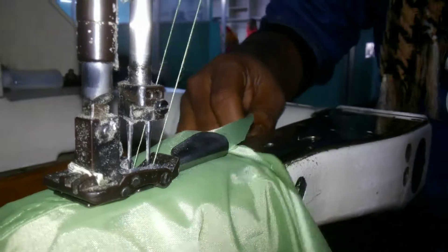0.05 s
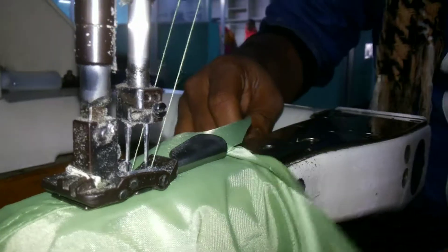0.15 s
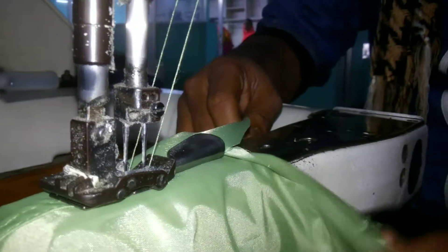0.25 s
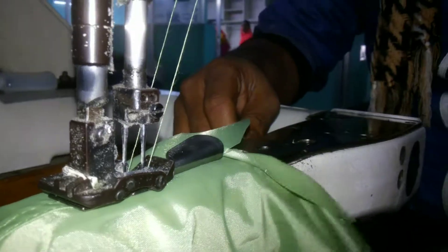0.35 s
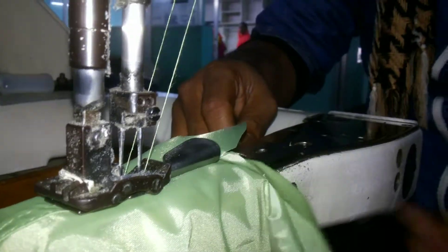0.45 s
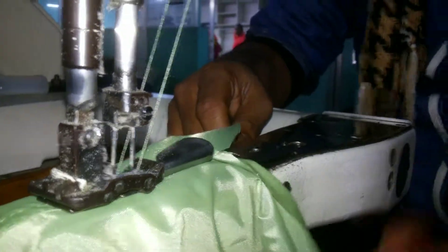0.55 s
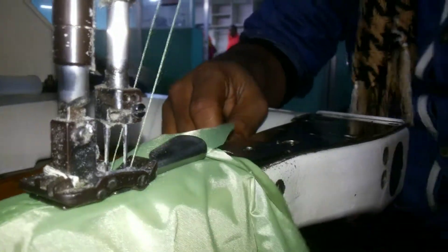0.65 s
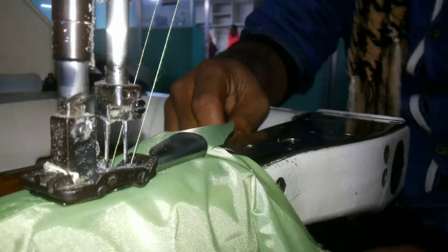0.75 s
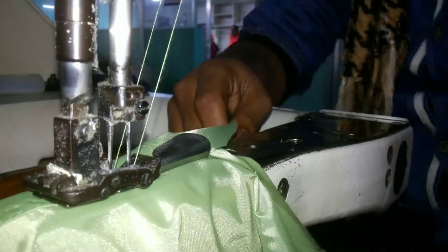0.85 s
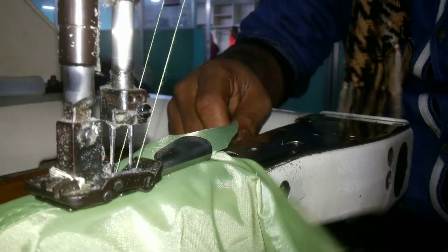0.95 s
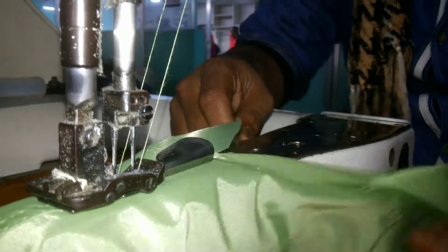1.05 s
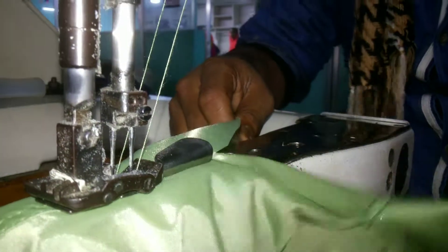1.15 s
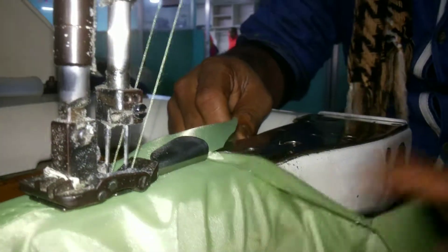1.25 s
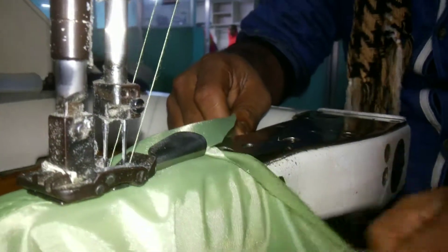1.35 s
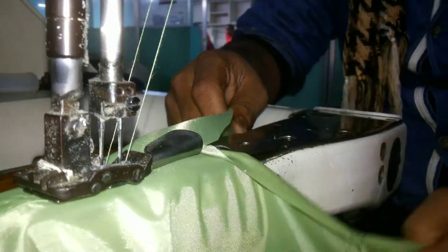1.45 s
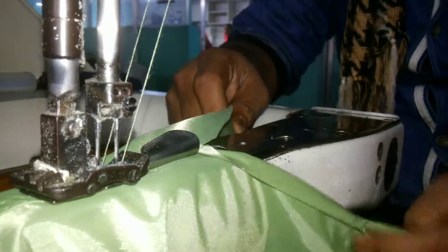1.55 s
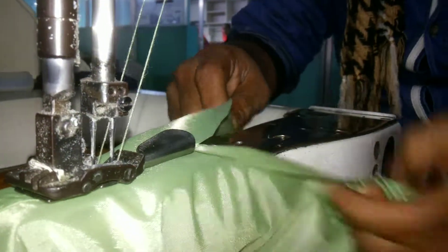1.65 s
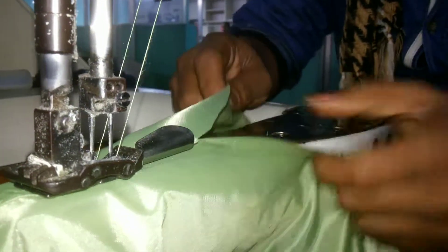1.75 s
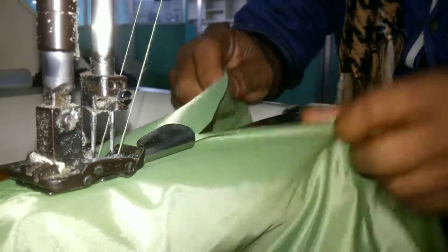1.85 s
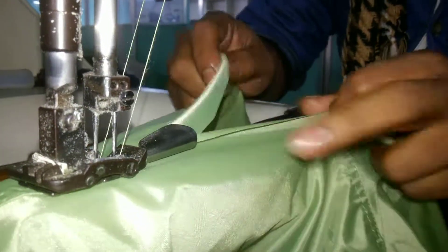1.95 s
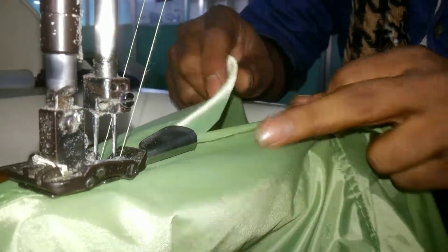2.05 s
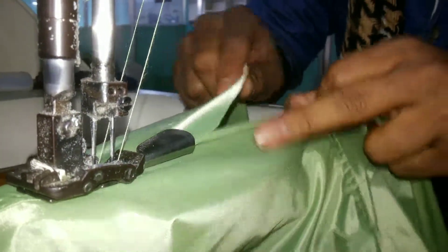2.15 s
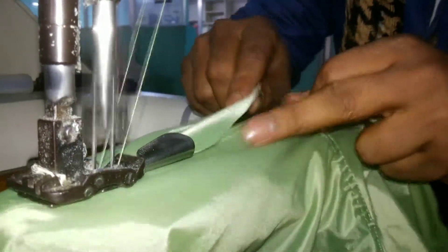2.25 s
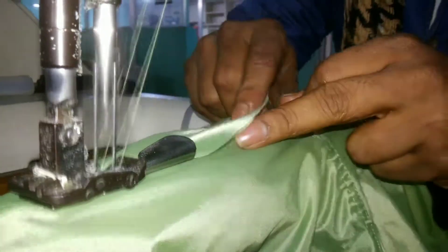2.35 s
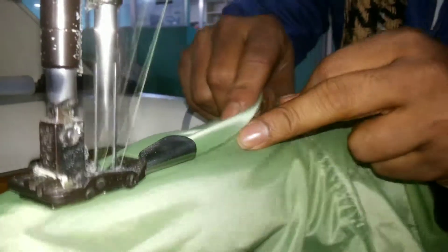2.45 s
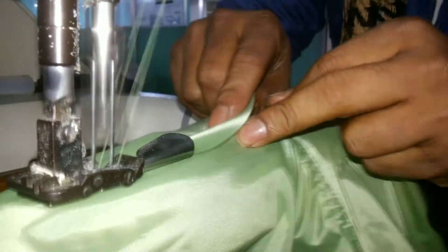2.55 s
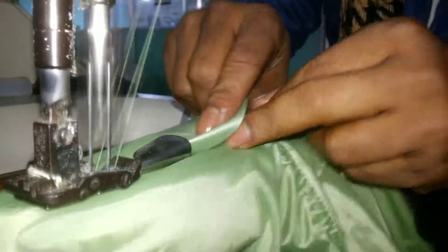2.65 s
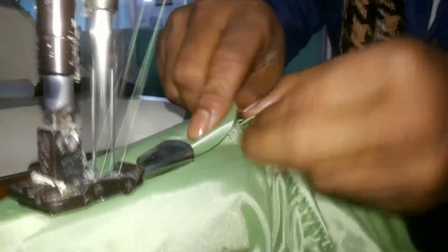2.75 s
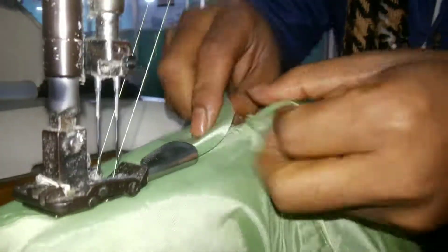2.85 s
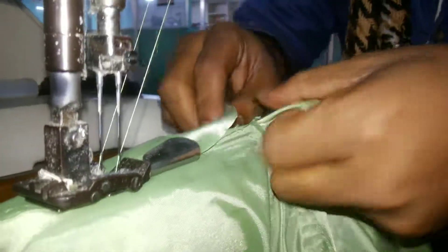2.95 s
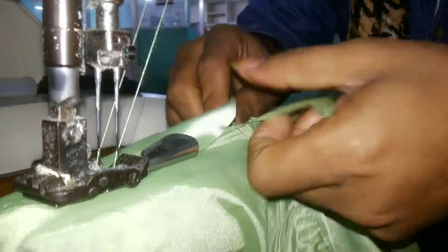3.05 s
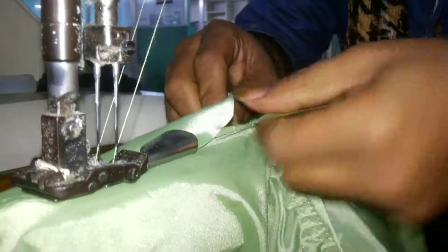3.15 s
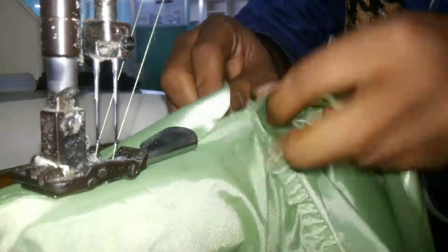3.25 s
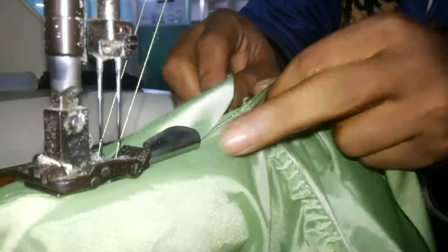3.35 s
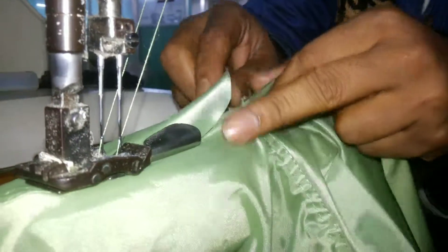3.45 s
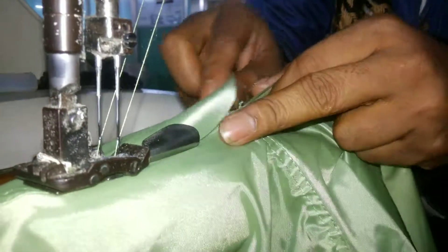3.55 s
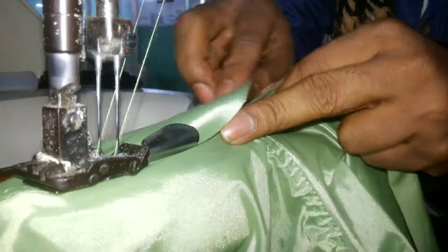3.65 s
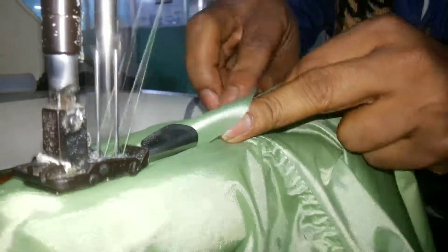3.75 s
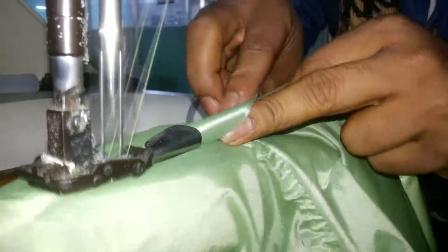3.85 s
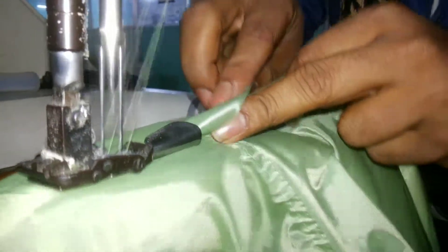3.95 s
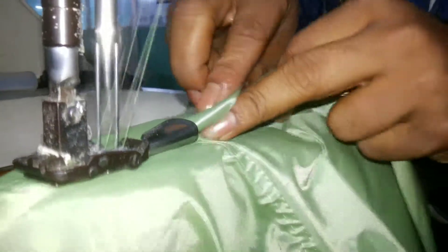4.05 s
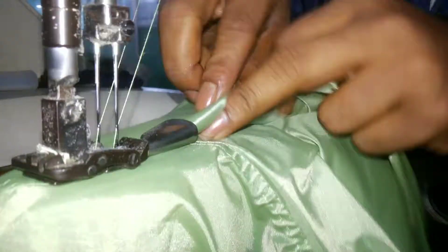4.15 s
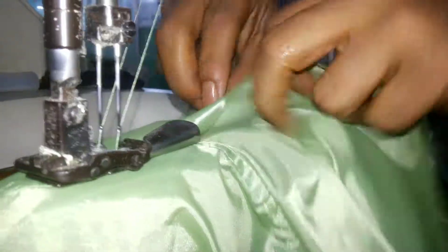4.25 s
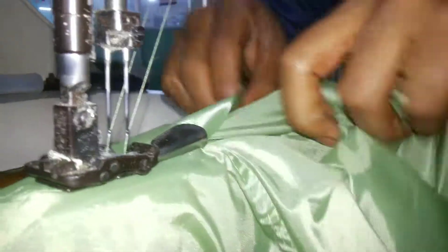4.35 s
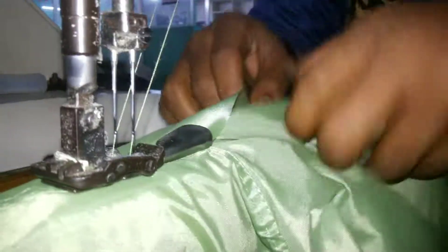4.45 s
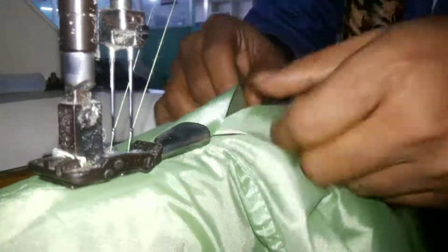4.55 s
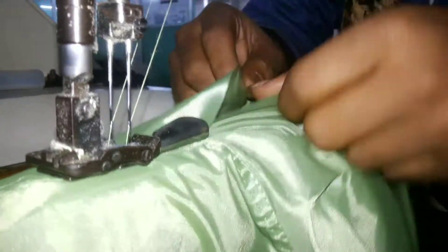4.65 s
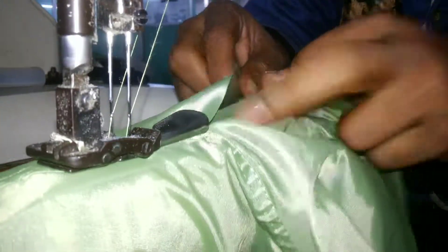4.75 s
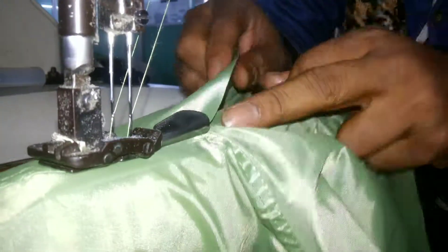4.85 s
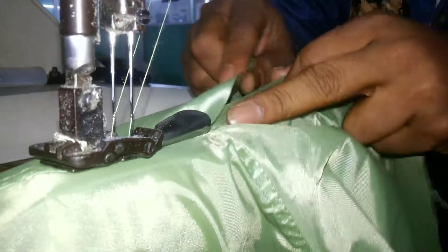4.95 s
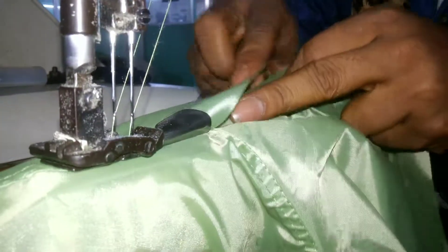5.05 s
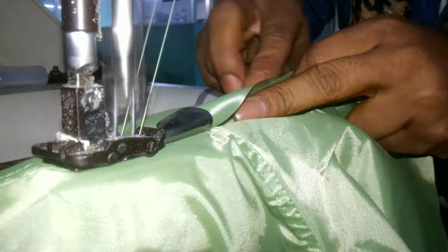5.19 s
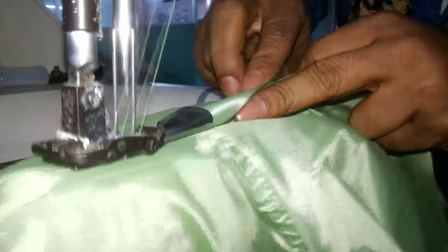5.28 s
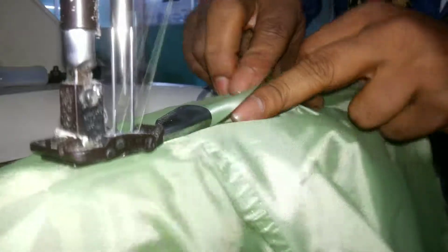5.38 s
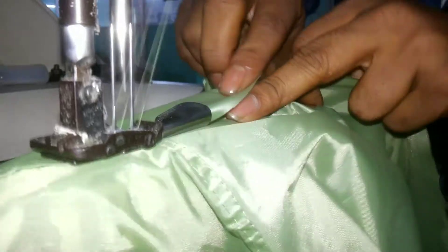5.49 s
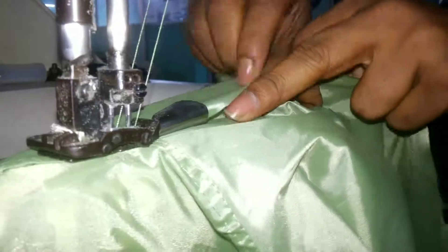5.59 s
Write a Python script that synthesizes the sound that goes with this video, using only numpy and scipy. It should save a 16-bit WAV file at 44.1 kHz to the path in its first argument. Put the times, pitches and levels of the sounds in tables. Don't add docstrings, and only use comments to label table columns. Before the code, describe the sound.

Close-up factory sewing: three fast mechanical bursts clunk in and out, separated by light cloth rustles and snaps over a faint motor hum.

```python
import sys
import numpy as np
from scipy import signal
from scipy.io import wavfile
from scipy.ndimage import uniform_filter1d

SR = 44100
rng = np.random.default_rng(int(sys.argv[2]) if len(sys.argv) > 2 else 0)


def natural_amplitude(level_db):
    exponent = np.asarray(level_db, float) / 20
    return 10 ** exponent


def dump(signal):
    limited = np.clip(np.atleast_2d(signal).T, -1, 1)
    pcm = np.round(limited * 32767).astype(np.int16)
    wavfile.write(sys.argv[1], SR, pcm)


N = 247842
T = np.arange(N) / SR

# (first stitch [s], grip [s], top speed [turns/s], brake [s], coasting time [s])
RUNS = [
    (2.3341, 2.2619, 48.31, 2.7904, .0802),
    (3.7803, 3.7342, 47.07, 4.0971, .0634),
    (5.2099, 5.2311, 47.47, 5.549, .1209),
]
STITCHES = [21, 14, 13]
SPIN_UP, CREEP = 197.7, 12.21
KNEE = 15.1
# (level [dB], drift [dB per stitch], slack of the first stitch [dB])
TICKS = [
    (-5, -0.12, 1),
    (-6.5, 0, -32),
    (-3, -0.57, -60),
]
SLACK_TURNS, COAST_DB = 0.37, -5.5
# (angle [turns], into casting [dB], into linkage [dB])
KNOCKS = [(.02, -4, -3), (.22, -2, -1), (.42, -8, -5), (.6, -1, 0), (.72, 0, -5), (.82, -6, -3)]
# (pitch [Hz], width [Hz], level [dB])
CASTING = [(380.6, 22, -11.5), (470, 53, -17.5), (597.2, 23, 1), (650, 167, 0.5), (900, 170, -3),
           (1088, 31, -5), (1235, 225, -5), (1438, 140, -8), (1560, 160, -9.5)]
# (frequency [Hz], level [dB per Hz])
LINKAGE = [(880, -40), (1500, -26), (1620, 3), (1830, -0.5), (2340, 6), (2640, 2.5), (4120, 1),
           (8080, -13.5), (12000, -14.5), (16000, -31)]
# (time [s], level [dB])
EFFORT = [
    [(2.12, -43), (2.17, -37.5), (2.22, -20), (2.25, -14), (2.4, -32.5), (2.42, -16), (2.8, -20),
     (2.88, -21), (3.12, -61)],
    [(3.646, -71), (3.7, -17.5), (3.77, -16), (3.776, -15), (3.832, -25.5), (3.99, -17.5), (4.112, -16.5),
     (4.166, -21.5), (4.36, -50)],
    [(5.11, -74), (5.144, -47), (5.186, -13.5), (5.274, -18.5), (5.34, -33.5), (5.43, -18), (5.564, -17.5),
     (5.58, -13), (5.63, -23)],
]
RATTLE_DB, RATTLE_SHARE, RATTLE_SPEED_DB = -22.5, 0.51, 12
# (multiple of the shaft speed, level [dB])
SHAKE = [(4, -26), (5, -30), (6, -29), (8, -14), (10, -13), (12, -9.5), (13, -6.5), (14, -12.5), (15, -7.5),
         (19, -12)]
# (pitch [Hz], width [Hz], level [dB])
TABLE_TOP = [(186.5, 4.2, -2), (234.2, 16.4, -2.5), (308, 51, -3.5)]
DRUM_DB, DRUM_SHARE, DRUM_FALL_DB_PER_S = -24, 0.54, 73
TUNED_SPEED, TUNED_WIDTH, TUNED_DB = 46.8, 1.6, 10.5
KICK_DB = -41
# (time [s], rod ring [dB], stand ring [dB], crack [dB], rise [s])
CLUNKS = [(2.098, -20, -21.5, -31.5, 0.007), (2.181, -19, -18, -23, 0.013), (2.2045, 3, -21, -7.5, 0.0029),
          (2.2135, -19, -11, -15, 0.00092), (2.2484, 4.5, -18, -8, 0.0011),
          (2.2909, -5, -9.5, -11.5, 0.0022), (2.7995, 6, -9, -10, 0.0012), (2.811, -2.5, -14, -6.5, 0.0039),
          (3.669, -13, -20, -19, 0.057), (3.6975, 1, -15.5, -7, 0.00035), (3.7215, -4, -9, -15, 0.0045),
          (3.735, 3.5, -13, -7.5, 0.00067), (3.7915, -6, -15, -12.5, 0.00064),
          (4.102, -0.5, -11, -8.5, 0.0032), (4.113, -9.5, -14, -32, 0.0051), (5.15, -19, -33, -36, 0.017),
          (5.1635, -15, -14, -16.5, 0.00047), (5.182, 2.5, -23, -7.5, 0.0036),
          (5.208, -2, -2.5, -5, 0.0021), (5.2205, 1, -3.5, -5.5, 0.00097), (5.238, -2, -12, -33, 0.0018),
          (5.275, -3, -45, -15.5, 0.0016), (5.572, -3, -16, -5.5, 0.0024), (5.584, -2, -18, -12, 0.0019)]
# (pitch [Hz], level [dB], time to fall 60 dB [s])
ROD = [(1033, -3.5, 0.13), (1120, -0.5, 0.057), (1197, 9, 0.026), (1275, 1.5, 0.14), (1385, 3, 0.091),
       (1495, -6, 0.11), (1690, -13, 0.12)]
# (pitch [Hz], level [dB], time to fall 60 dB [s])
STAND = [(414, -20, 0.42), (574, -15, 0.018), (621, -16, 0.029), (682.7, 3.5, 0.18), (808, 7, 0.027)]
# (pitch [Hz], level [dB], time to fall 60 dB [s])
CRACK = [(1750, 0, .012), (2050, 0, .015), (2600, -1, .012), (3050, -2, .01), (3450, -1, .012),
         (4300, -6, .008), (6000, -12, .006)]
# (time [s], peak [dB], pitch [Hz])
THUDS = [
    (2.2345, -3, 640),
    (3.7735, 0, 620),
    (5.26, 2, 625),
]
# (frequency [Hz], level [dB per Hz])
CLOTH = [(200, -26), (500, -8.5), (1200, -6), (2200, -11), (3200, -6.5), (4600, -6.5), (5300, -14),
         (8000, -19.5), (12000, -20.5), (16000, -31)]
# (start [s], length [s], level [dB])
SWISHES = [(0, 0.066, -50), (0.274, 0.052, -45), (0.329, 0.061, -43.5), (.7, 0.081, -60),
           (0.937, 0.092, -46.5), (1.001, 0.17, -36.5), (1.134, 0.25, -45), (1.37, 0.14, -44.5),
           (1.57, 0.16, -42), (1.7, 0.091, -45), (1.778, 0.12, -48), (1.93, 0.044, -42.5),
           (2.094, 0.15, -61), (3.014, 0.063, -41.5), (3.205, 0.097, -48), (3.291, 0.079, -41.5),
           (3.435, 0.11, -44.5), (4.227, 0.091, -34.5), (4.304, 0.1, -43.5), (4.363, 0.21, -42.5),
           (4.561, 0.086, -47), (4.688, 0.14, -48), (4.798, 0.015, -32), (4.807, 0.087, -39),
           (4.954, 0.041, -49.5), (5.101, 0.042, -43)]
# (time [s], peak [dB], pitch [Hz], time to fall 60 dB [s])
SNAPS = [(.2862, -27, 4220, 0.0049), (0.2946, -12.5, 770, 0.0064), (0.2956, -26, 3520, 0.0033),
         (0.3559, -5, 3550, 0.0023), (0.3544, -14, 1160, 0.0052), (0.4218, -22, 3680, 0.0026),
         (1.04, -21, 1900, .003), (1.0822, -2.5, 3160, 0.0027), (1.0914, -11, 1400, 0.0025),
         (1.101, -19, 900, 0.0061), (1.1099, -7, 1540, 0.0029), (1.108, -18, 427, 0.029),
         (1.142, -28, 3040, .005), (1.263, -15.5, 1120, 0.0023), (1.287, -15.5, 1020, 0.0025),
         (1.356, -22, 1040, 0.0051), (1.451, -28.5, 3880, 0.012), (1.755, -11, 4300, 0.0013),
         (1.872, -21.5, 814, 0.006), (1.957, -29, 3920, 0.0039), (3.053, -35, 9500, 0.0078),
         (4.28, -21.5, 3650, 0.02), (3.332, -27, 4530, 0.0036), (3.481, -38, 1010, .01),
         (4.512, -21, 705, 0.0065), (4.438, -10, 900, 0.0016), (4.688, -27, 3040, 0.0034),
         (4.806, -8, 3480, 0.0024), (4.835, -23, 3300, 0.008), (5.1264, -29, 4500, 0.006)]
# (time [s], level [dB], pitch [Hz])
SQUEAK = [(.449, -52, 3000), (.456, -38, 3300), (.461, -38, 3800), (.465, -41, 3700), (.468, -52, 3200)]
# (frequency [Hz], time to fall 60 dB [s])
WALLS = [(200, 1), (1000, 0.7), (4000, 0.56), (12000, 0.067)]
# (frequency [Hz], level [dB per Hz])
HALL = [(20, -45), (40, -39), (100, -18), (200, -11), (400, -4), (750, -10), (1500, -15.5), (1900, -21),
        (2500, -21), (3300, -19), (4700, -23.5), (5500, -32), (7500, -31), (16000, -35.5)]
HALL_DB = -45.5
# (pitch [Hz], level [dB])
HUM = [(308, -62), (409.1, -49), (613.7, -57), (663, -60), (716, -52), (855.9, -64), (1502, -62),
       (1556, -62), (1707, -65), (1770, -65), (2256, -67), (2509, -65)]


def evened(x):
    return x / np.sqrt(np.mean(x ** 2) + 1e-20)


def steadied(x):
    return x / np.sqrt(uniform_filter1d(x ** 2, SR // 8) + 1e-12)


def read(points, hz):
    f, value = np.transpose(points)
    return np.interp(np.log(hz + 1), np.log(f + 1), value)


def follow(tables):
    gain = 0
    for rows in tables:
        times, levels = [r[0] for r in rows], [r[1] for r in rows]
        gain = gain + natural_amplitude(np.interp(T, times, levels, -150, -150))
    return gain


def colour(x, spectrum):
    log_gain = np.log(natural_amplitude(read(spectrum, abs(np.fft.fftfreq(4096, 1 / SR)))))
    taps = np.fft.ifft(np.exp(np.conj(signal.hilbert(log_gain)))).real[:2048]
    return signal.oaconvolve(x, taps / np.linalg.norm(taps))[:N]


def resonate(x, hz, width):
    turn = np.exp(2j * np.pi * np.cumsum(hz * np.ones(len(x))) / SR)
    r = np.exp(-np.pi * width / SR)
    return 2 * (turn * signal.lfilter([1 - r], [1, -r], x / turn)).real


def clicks(per_s, spread_db):
    size = natural_amplitude(spread_db * np.minimum(rng.exponential(1, N), 4)) * rng.choice([-1., 1.], N)
    return evened(size * (rng.random(N) < per_s / SR))


def add(mix, s, sound):
    part = mix[round(s * SR):][:len(sound)]
    part += sound[:len(part)]


def shaft():
    runs = []
    for (first, grip, top, brake, coast), last in zip(RUNS, STITCHES):
        ramp = np.maximum(CREEP, SPIN_UP * (T - grip))
        driven = (ramp ** -KNEE + top ** -KNEE) ** (-1 / KNEE)
        speed = driven * np.exp(-np.maximum(T - brake, 0) / coast)
        angle = np.cumsum(speed + 1e-6) / SR
        runs.append((angle - np.interp(first, T, angle), last))
    return runs


def shaft_speed(runs):
    return sum(np.gradient(uniform_filter1d(np.clip(angle, 0, last), 800)) * SR for angle, last in runs)


def needle(runs):
    out, t = np.zeros(N), np.arange(300) / SR
    for (angle, last), run, (level_db, drift_db, slack_db) in zip(runs, RUNS, TICKS):
        for k in np.arange(last + 1):
            s = np.interp(k, angle, T)
            coasting_s = max(s - run[3], 0)
            db = level_db + drift_db * k + slack_db * np.exp(-k / SLACK_TURNS) + COAST_DB * coasting_s / .1
            hz = 4700 * rng.uniform(.96, 1.04)
            grit = evened(resonate(rng.standard_normal(300), 10000, 7000))
            tones = np.sin(2 * np.pi * hz * t) + .6 * np.sin(2 * np.pi * 1.27 * hz * t)
            steel = -tones * natural_amplitude(-60 * t / .003)
            tick = .8 * steel + .065 * grit * natural_amplitude(-60 * t / .02)
            add(out, s + .0006, natural_amplitude(db + 1.5 * rng.standard_normal()) * tick)
    return out


def linkage(runs):
    heavy, light = np.zeros(N), np.zeros(N)
    for turns, last in runs:
        for k in np.arange(last):
            slack = rng.standard_normal((len(KNOCKS), 3))
            for (angle, heavy_db, light_db), (late, a, b) in zip(KNOCKS, slack):
                at = np.interp(k + angle, turns, T) + .00012 * late
                scrape = rng.standard_normal(60) * np.exp(-np.arange(60) / 20)
                add(heavy, at, np.array([natural_amplitude(heavy_db + 1.74 * a)]))
                add(light, at, natural_amplitude(light_db + 1.5 * b) * scrape)
    heavy = 1.3 * heavy / 0.074 + clicks(1500, 0.46)
    light = 3 * light + clicks(5000, 3.)
    rumble = np.zeros(N)
    for k, (hz, width, db) in enumerate(CASTING):
        rumble += (-1) ** k * natural_amplitude(db) * resonate(heavy, hz, width) / np.sqrt(width)
    rattle = colour(light, [(600, -43)] + LINKAGE)
    effort = follow(EFFORT)
    loose = natural_amplitude(RATTLE_DB + RATTLE_SPEED_DB * shaft_speed(runs) / 48) * effort ** RATTLE_SHARE
    return effort * steadied(rumble) + loose * steadied(rattle)


def shake(runs):
    speed, out = shaft_speed(runs), np.zeros(N)
    angle = np.cumsum(speed) / SR
    for k, db in SHAKE:
        wobble = natural_amplitude(2.7 * evened(uniform_filter1d(rng.standard_normal(N), 1500)))
        out += natural_amplitude(db) * wobble * np.sin(2 * np.pi * (k * angle + rng.random()))
    return follow(EFFORT) * (speed / 48) ** 2 * out


def table_top(runs):
    push, boom = clicks(600, 1.1), np.zeros(N)
    for hz, width, db in TABLE_TOP:
        boom += natural_amplitude(db) * evened(resonate(resonate(push, hz, width), hz, 2 * width))
    tuned_db = TUNED_DB * np.exp(-((shaft_speed(runs) - TUNED_SPEED) / TUNED_WIDTH) ** 2)
    drive = natural_amplitude(DRUM_DB + tuned_db) * follow(EFFORT) ** DRUM_SHARE
    for s, db, _ in THUDS:
        add(drive, s, natural_amplitude(db + KICK_DB) * np.hanning(1500))
    fall = DRUM_FALL_DB_PER_S * T
    held_db = np.maximum.accumulate(20 * np.log10(drive) + fall) - fall
    return natural_amplitude(uniform_filter1d(held_db, 900) - 4.5) * evened(boom)


def ring(modes, scrape_s, rise_s):
    t = np.arange(SR // 5) / SR
    spot = rng.standard_normal((len(modes), 2))
    tones = np.zeros(len(t))
    for (hz, db, t60), (a, b) in zip(modes, spot):
        tones += natural_amplitude(db + 1.5 * a - 60 * t / t60) * np.sin(2 * np.pi * hz * (1 + .008 * b) * t)
    short = t[:1500]
    rise = 1 - np.exp(-short / max(rise_s, 1e-4))
    contact = rng.standard_normal(1500) * np.exp(-short / scrape_s) * rise
    out = signal.fftconvolve(tones, contact)
    return out / abs(out).max()


def treadle():
    out, t = np.zeros(N), np.arange(2000) / SR
    for s, rod_db, stand_db, crack_db, rise_s in CLUNKS:
        add(out, s, natural_amplitude(rod_db) * ring(ROD, .001 + rise_s, rise_s))
        add(out, s, natural_amplitude(stand_db) * ring(STAND, 0.0033 + rise_s, rise_s))
        add(out, s, natural_amplitude(crack_db) * ring(CRACK, 0.014 + rise_s, rise_s))
    for s, db, hz in THUDS:
        swell = t / .0028 * np.exp(1 - t / .0028)
        add(out, s, natural_amplitude(db) * swell * np.sin(2 * np.pi * hz * t))
    return out


def swishes():
    stroke = np.zeros(N)
    for s, length, db in SWISHES:
        add(stroke, s, natural_amplitude(db) * signal.windows.tukey(round(1.224 * length * SR), .9))
    clumps = natural_amplitude(2.0 * evened(uniform_filter1d(rng.standard_normal(N), 300)))
    return stroke * evened(colour(clumps * clicks(5000, 1.2), CLOTH))


def snaps():
    out, t = np.zeros(N), np.arange(1500) / SR
    for s, db, hz, t60 in SNAPS:
        onset = 1 - np.exp(-t * hz * 10.0)
        crease = evened(resonate(rng.standard_normal(1500), hz, .8 * hz)) * natural_amplitude(-16 - 60 * t / (4 * t60))
        snap = onset * (np.sin(2 * np.pi * hz * t) * natural_amplitude(-60 * t / t60) + crease)
        soft = signal.butter(2, min(1.7 * hz, 15000), fs=SR)
        add(out, s, natural_amplitude(db - 0.5) * signal.lfilter(*soft, snap))
    return out


def squeak():
    hz = np.interp(T, [r[0] for r in SQUEAK], [r[2] for r in SQUEAK])
    return follow([SQUEAK]) * evened(resonate(resonate(rng.standard_normal(N), hz, 500), hz, 900))


def walls(x):
    taps = np.zeros(SR)
    at = np.arange(300, SR - 20, 20)
    taps[at + rng.integers(0, 20, len(at))] = rng.choice([-1., 1.], len(at))
    hz, t, z = signal.stft(taps, SR, nperseg=256)
    decay = natural_amplitude(-60 * t / np.maximum(read(WALLS, hz), .05)[:, None])
    tail = signal.istft(z * decay, SR, nperseg=256)[1]
    return signal.fftconvolve(x, tail / np.linalg.norm(tail))[:N]


def distant_machines():
    frames, hz = N // 256 + 5, np.fft.rfftfreq(1024, 1 / SR)
    a, b, patches = rng.standard_normal((frames, 513, 3)).T
    patches = evened(uniform_filter1d(uniform_filter1d(patches, 10, 0), 14, 1))
    z = (a + 1j * b) * natural_amplitude(read(HALL, hz)[:, None] + 1.3 * patches)
    return natural_amplitude(HALL_DB) * evened(signal.istft(z, nperseg=1024, noverlap=768)[1][:N])


def idling_motor():
    out = np.zeros(N)
    for hz, db in HUM:
        waver = evened(resonate(rng.standard_normal(N), hz, 5.))
        tone = np.sqrt(2) * np.sin(2 * np.pi * (hz * T + rng.random()))
        out += natural_amplitude(db) * (.9 * tone + .45 * waver)
    return out


def scene():
    runs = shaft()
    blows = treadle() + needle(runs)
    fabric = swishes() + snaps() + squeak()
    echo = walls(natural_amplitude(-15) * blows + natural_amplitude(-17.5) * fabric)
    near = blows + fabric + echo + linkage(runs) + shake(runs) + table_top(runs)
    near = signal.sosfilt(signal.butter(3, 150, "high", fs=SR, output="sos"), near)
    return (near + distant_machines() + idling_motor())[None]


def band_limit(x):
    return signal.sosfilt(signal.butter(12, 16320, fs=SR, output="sos"), x)


def record(dry):
    x = signal.sosfiltfilt(signal.butter(16, 16000, fs=SR, output="sos"), dry)
    x = np.clip(x, -.7, .69)
    return band_limit(x)


dry = scene()
out = record(dry)
dump(out)
```